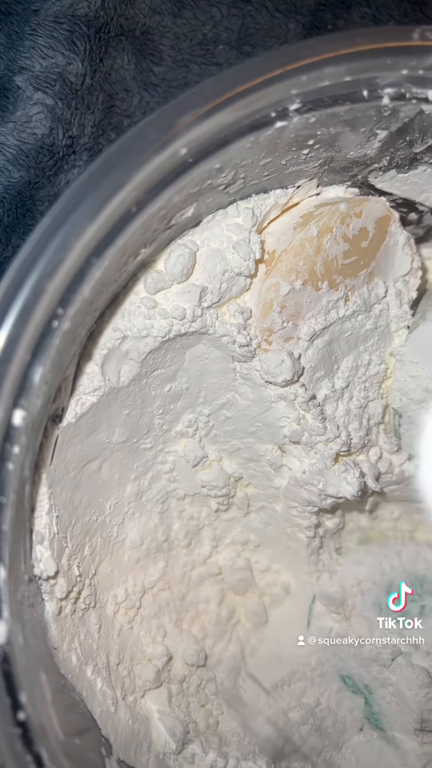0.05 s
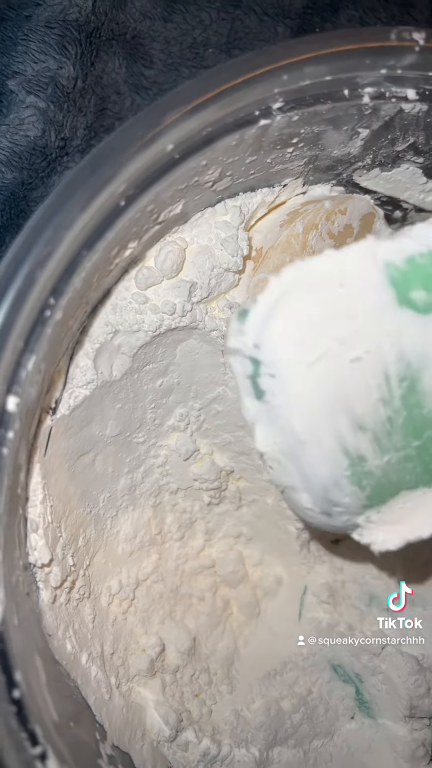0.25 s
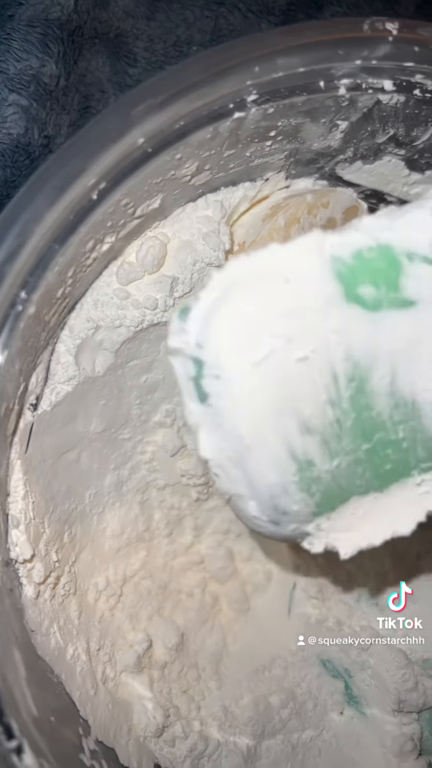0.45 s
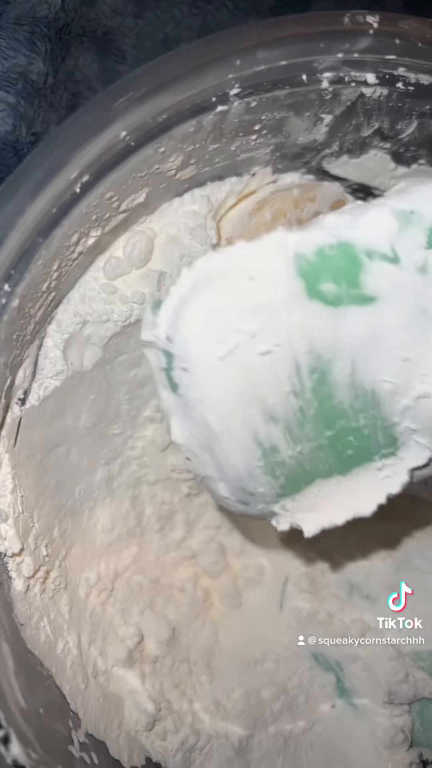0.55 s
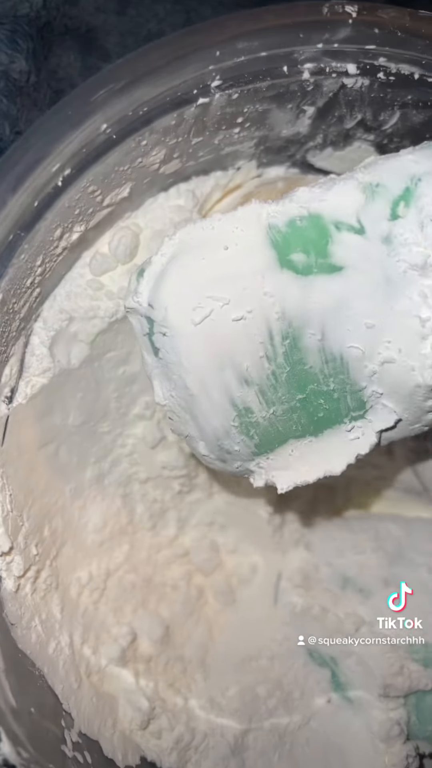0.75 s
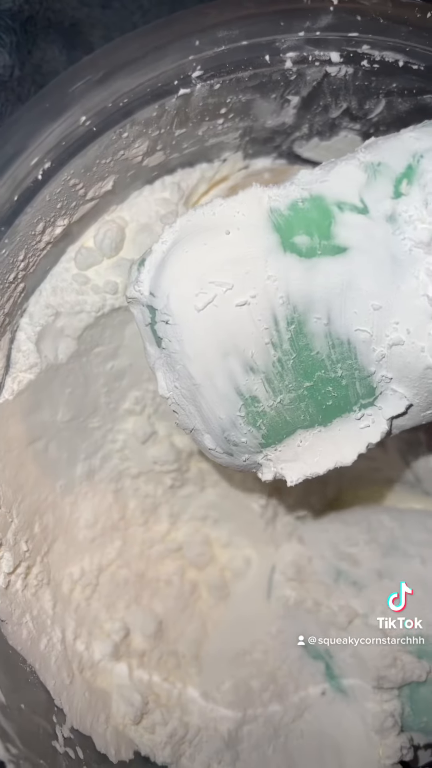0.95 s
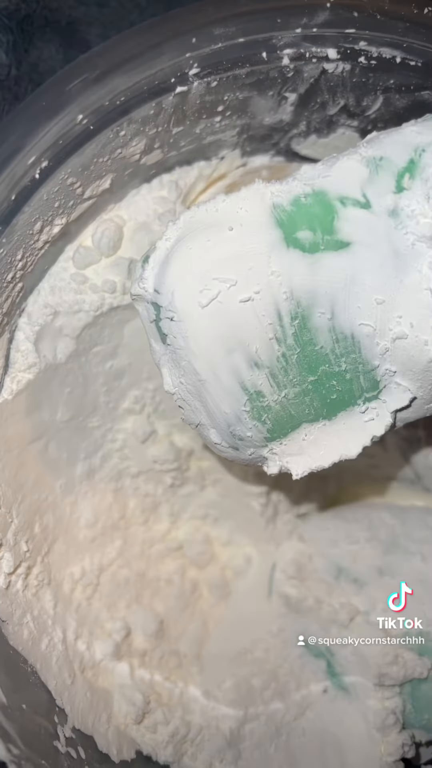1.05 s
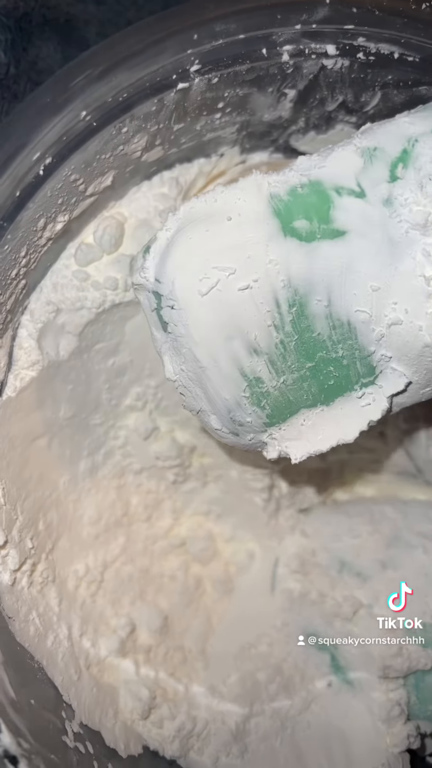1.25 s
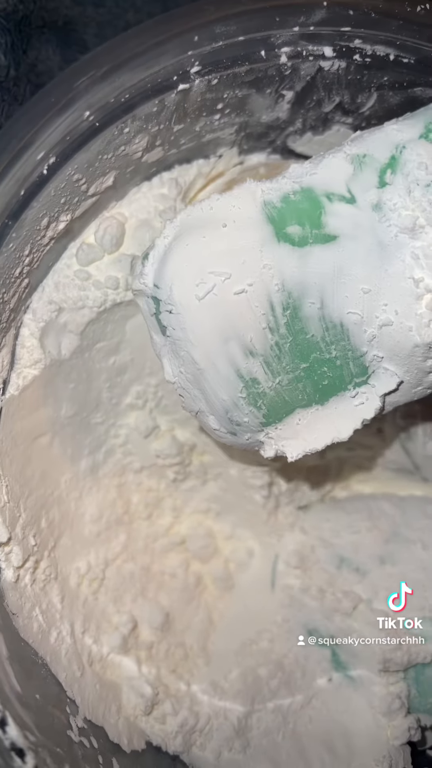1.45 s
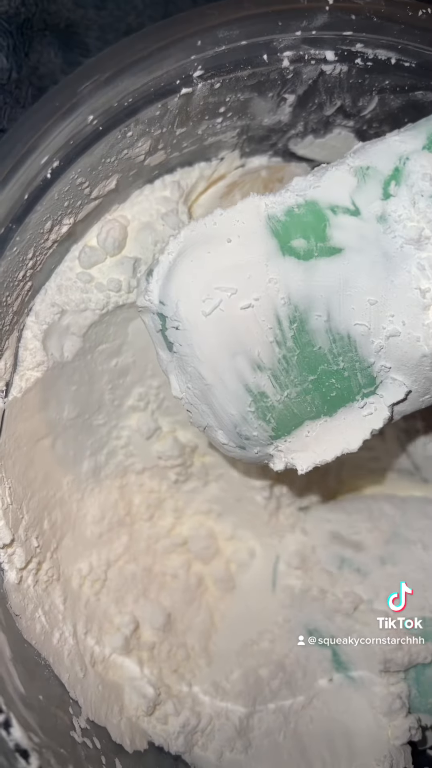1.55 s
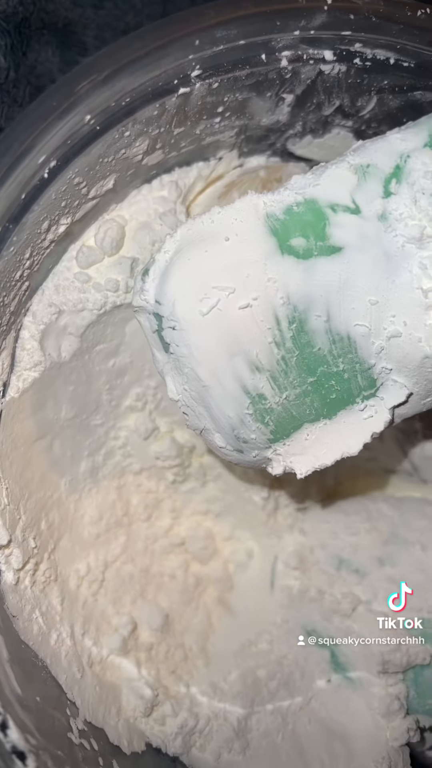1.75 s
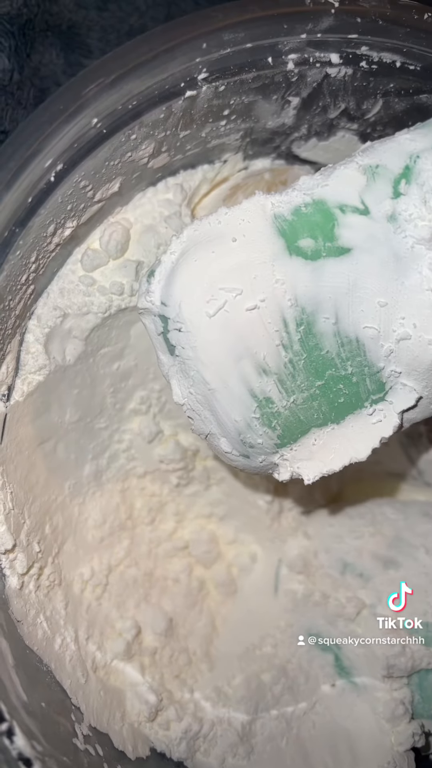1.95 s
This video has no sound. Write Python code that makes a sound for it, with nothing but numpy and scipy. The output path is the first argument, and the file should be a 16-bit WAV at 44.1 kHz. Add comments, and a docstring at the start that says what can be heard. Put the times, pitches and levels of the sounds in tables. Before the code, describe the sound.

Cornstarch crunches and squeaks as a spatula presses into it twice in a bowl.

```python
"""In a bowl of cornstarch, close to the microphone, a spatula is pressed down twice.
The powder yields by stick-slip friction: quick bursts of tiny grain clicks grow into separate
creaking snaps as it packs, and the hollow under the spatula resonates. Each press ends in a short
squeak, where the slips fuse into a tone. Around the presses come ticking crumbs, small knocks of
the bowl and soft rustles, over a low handling rumble. At the very end a new press just begins."""
import sys
import numpy as np
from scipy import signal
from scipy.io import wavfile
from scipy.ndimage import uniform_filter1d

SR = 44100
rng = np.random.default_rng(int(sys.argv[2]) if len(sys.argv) > 2 else 0)


def wav_record(signal):
    """Record a signal, one row per channel, as 16-bit PCM in the file named by sys.argv[1]."""
    frames = np.transpose(np.atleast_2d(signal))
    bounded = np.clip(frames, -1, 1)
    # unit amplitude maps onto the largest positive 16-bit level
    quanta = np.round(bounded * 32767).astype(np.int16)
    wavfile.write(sys.argv[1], SR, quanta)


N = 88200
T = np.arange(N) / SR

# strength of the handling rumble: t/s, level/dB
RUMBLE_ENVELOPE = [(0, -55.5), (.9, -56), (1.62, -56.5), (1.74, -54.5), (1.85, -57.5)]
# spectra of the rumble and of hiss: f/Hz, relative level/dB
RUMBLE_SPECTRUM = [(20, -37), (52, 3), (70, -5.5), (110, -8), (260, -21.5), (700, -51.5)]
HISS_SPECTRUM = [(100, -9), (400, 2), (900, -10.5), (2500, -9.5), (6000, -22.5), (15000, -39.5)]
# crumbs ticking as the spatula arrives: t/s, level/dB
CRUMB_TICKS = [(0.0131, -47), (0.0362, -41.5), (0.067, -46.5), (0.142, -54), (0.162, -51), (.186, -42),
               (1.304, -52)]
# spectra of loose and of packed powder: f/Hz, relative level/dB
LOOSE_SPECTRUM = [(120, -9), (440, -8), (700, -15.5), (1150, -16.5), (2340, -3), (3240, -12.5), (3580, -12),
                  (5170, -19), (5960, -26.5), (10100, -36.5), (15500, -47.5)]
PACKED_SPECTRUM = [(120, -30.5), (270, -12.5), (450, -3.5), (1000, -2.5), (1220, -11.5), (1530, 0),
                   (1950, -5.5), (2600, -2.5), (3150, -10.5), (3600, -5), (5000, -15), (6400, -24.5),
                   (9700, -30.5), (15500, -38)]
# first press: t/s, level/dB, slip rate/Hz, level of slip over stick/dB, packing (0-1)
PACKING_PRESS = [(.19, -66, 280, -23, 0), (.255, -47, 237, -3, .1), (.32, -38, 223, 11, 0.32),
                 (.405, -36.5, 171, 5, 0.06), (.44, -38, 167, 11.5, 0.37), (.605, -37, 149, 14, 0.36),
                 (.66, -34, 169, 13.5, 0.56), (.77, -35, 170, 16.5, 0.69), (.86, -43.5, 190, 8.5, 0.71),
                 (.93, -37, 190, 16, 1), (.99, -59.5, 92, 28, 0.88)]
# second press, into packed powder: t/s, level/dB
PACKED_PRESS = [(1.31, -61.5), (1.45, -42.5), (1.495, -38.5), (1.55, -37.5), (1.625, -41), (1.645, -45.5),
                (1.688, -54), (1.708, -47), (1.755, -75)]
# resonance of the hollow under the spatula: t/s, f/Hz, gain/dB
HOLLOW_RESONANCE = [(.28, 370, 5), (.405, 407, 15), (.435, 446, -1), (.47, 470, 9.5), (.74, 572, 3),
                    (.95, 565, 9), (1.48, 425, 12), (1.6, 546, 3.5), (1.67, 406, 14)]
# knocks of the bowl: t/s, click level/dB, thud level/dB
BOWL_KNOCKS = [(0.199, -40, -46), (.565, -37, -45), (.906, -34, -45.5), (0.991, -37.5, -46.5),
               (1.2154, -48, -47), (1.874, -45.5, -49.5)]
# spectrum of the spatula, rubbed or knocked: f/Hz, relative level/dB
SPATULA_SPECTRUM = [(230, 3.5), (600, -1.5), (1100, -17), (1500, -8), (2900, -10.5), (3450, -5),
                    (4500, -19), (5100, -11), (6200, -36.5), (12000, -43)]
# separate collapses of the powder: t/s, level/dB
COLLAPSES = [(0.3958, -26), (0.4579, -26), (0.536, -27.5), (0.5652, -19.5), (0.5682, -23), (0.6309, -30),
             (.6441, -26.5), (0.6557, -23.5), (0.6628, -26), (0.6723, -26.5), (.6947, -27.5), (.72, -23.5),
             (.7252, -28.5), (0.7473, -26), (0.7558, -26), (0.7771, -25.5), (0.789, -34.5), (0.8114, -27),
             (.8261, -25.5), (0.8468, -24), (.857, -27), (0.8765, -23.5), (0.9085, -23.5), (.954, -31.5),
             (0.964, -34.5), (1.543, -32), (1.5632, -38), (1.5886, -30.5), (1.613, -37), (1.631, -30.5)]
# squeaks as the pressure lets go: t/s, duration/s, start f/Hz, end f/Hz, level/dB
RELEASE_SQUEAKS = [(1.0298, .0235, 823, 3040, -43.5), (1.704, .033, 759, 2190, -52.5)]
# spectrum of a squeak: f/Hz, relative level/dB
SQUEAK_SPECTRUM = [(300, -9), (950, -2), (2450, 3.5), (3100, -7), (9000, -34.5)]
# a light rustle after each press, then the swelling crunch of a new press starting in loose powder:
# t/s, rise/s, decay/s, level/dB
GRAINY_SWELLS = [(1.103, 0.021, .12, -51.5), (1.795, 0.023, .11, -54), (1.96, 0.16, .1, -49.5)]


def amp(db):
    """Amplitude ratio of a level in decibels."""
    return 10 ** (np.asarray(db) / 20)


def unit_rms(x):
    """Normalisation to unit mean power."""
    return x / np.sqrt(np.mean(x ** 2) + 1e-20)


def unit_peak(x):
    """Normalisation to unit envelope at the loudest moment."""
    return x / np.sqrt(2 * uniform_filter1d(x ** 2, size=45).max())


def add(mix, s, sound):
    """Superposition of a sound that starts at time s."""
    part = mix[max(round(s * SR), 0):][:len(sound)]
    part += sound[:len(part)]


def add_centred(mix, s, sound):
    """Superposition of a sound centred on time s."""
    half = len(sound) // 2
    padded = np.pad(mix, (half, 0))
    add(padded, s, sound)
    mix[:] = padded[half:]


def curves(table):
    """Linear interpolation of each column over time."""
    s, *columns = np.transpose(table)
    return [np.interp(T, s, c) for c in columns]


def during(table):
    """Rectangular window over a table's time span."""
    return (T > table[0][0]) & (T < table[-1][0])


def colour(x, spectrum, size=4096):
    """Minimum-phase filtering, with unit energy in the impulse response."""
    f, db = np.transpose(spectrum)
    hz = abs(np.fft.fftfreq(size, 1 / SR))
    gain = amp(np.interp(np.log(hz + 1), np.log(f + 1), db))
    log_gain = np.log(np.maximum(gain, 1e-5))
    response = np.exp(np.conj(signal.hilbert(log_gain)))
    taps = np.fft.ifft(response).real[:size // 2]
    return signal.fftconvolve(x, taps / np.linalg.norm(taps))[:len(x)]


def background():
    """Filtered noise: low handling rumble and a faint hiss."""
    rumble = unit_rms(colour(rng.standard_normal(N), RUMBLE_SPECTRUM, size=16384))
    hiss = amp(-64) * colour(rng.standard_normal(N), HISS_SPECTRUM)
    return rumble * amp(curves(RUMBLE_ENVELOPE)[0]) + hiss


def burst(ms, size=2048):
    """A brief pulse is broadband: a main slip inside a longer, weaker shower of grains."""
    t_ms = (np.arange(size) - size // 2) * 1000 / SR
    main, skirt = (np.cos(np.pi * np.clip(t_ms / width, -.5, .5)) ** 2 for width in (ms, 1.9 * ms))
    return rng.standard_normal(size) * (main + amp(-19.5) * skirt)


def softened(x, level_db):
    """Gentle pressure breaks grains less sharply, and a blunter pulse carries less treble."""
    low = signal.sosfiltfilt(signal.butter(2, 5360, fs=SR, output="sos"), x)
    treble_db = 0.8 * np.maximum(level_db + 35, -20)  # flat at a level of -35 dB
    return low + (x - low) * amp(treble_db)


def crumbs():
    """Impulsive excitation: loose crumbs tick as the spatula arrives."""
    out = np.zeros(N)
    for s, db in CRUMB_TICKS:
        tick = colour(softened(burst(ms=2.4), db), LOOSE_SPECTRUM)
        add_centred(out, s, amp(db) * unit_peak(tick))
    return out


def bowl_reflections(x, decay_s=0.01):
    """Early reflections from the walls of the bowl die away exponentially."""
    t = T[:SR // 20]
    taps = rng.standard_normal(len(t)) * np.exp(-t / decay_s)
    return x + amp(-11.5) * signal.fftconvolve(x, taps / np.linalg.norm(taps))[:N]


def stick_slip(level_db, slip_hz, depth_db, jitter=.22, decay_cycles=.32, grains_per_s=11000):
    """Relaxation oscillation: each uneven slip sets off a dying shower of grain clicks."""
    wander = unit_rms(uniform_filter1d(rng.standard_normal(N), size=300))
    cycles = np.cumsum(slip_hz * np.exp(jitter * wander)) / SR
    strength_db = rng.standard_normal(N)[cycles.astype(int)]  # one draw per slip
    envelope = amp(strength_db + depth_db * np.exp(-(cycles % 1 / decay_cycles) ** 2))
    grains = rng.choice([-1, 1], N) * amp(2 * rng.standard_normal(N))
    grains *= rng.random(N) < grains_per_s / SR
    shower = envelope * grains
    running_rms = np.sqrt(abs(uniform_filter1d(shower ** 2, size=1100)) + 1e-9)
    return amp(level_db) * softened(shower, level_db) / running_rms


def powder(x, packing):
    """Compaction shifts the powder's spectrum from loose to packed."""
    return (1 - packing) * colour(x, LOOSE_SPECTRUM) + packing * colour(x, PACKED_SPECTRUM)


def resonate(x, hz, width_hz):
    """Resonance by heterodyning: shift hz down to zero, low-pass, shift back."""
    carrier = np.exp(2j * np.pi * np.cumsum(hz * np.ones(N)) / SR)
    r = np.exp(-np.pi * width_hz / SR)
    baseband = signal.lfilter([(1 - r) ** 2], [1, -2 * r, r * r], x / carrier + 1e-18)
    return 2 * (carrier * baseband).real


def hollow(x, packing):
    """Cavity resonance: the hollow groans at a moving pitch; packing adds a higher mode."""
    hz, db = curves(HOLLOW_RESONANCE)
    lower = amp(db) * resonate(x, hz, width_hz=225)
    upper = amp(6.5) * packing * resonate(x, hz=891, width_hz=245)
    return lower + upper


def presses(packing):
    """Source and filter: two spells of stick-slip friction excite the powder and the hollow."""
    level_db, slip_hz, depth_db, _ = curves(PACKING_PRESS)
    first = stick_slip(level_db, slip_hz, depth_db) * during(PACKING_PRESS)
    second = stick_slip(*curves(PACKED_PRESS), slip_hz=420, depth_db=5.5) * during(PACKED_PRESS)
    return powder(first, packing) + colour(second, PACKED_SPECTRUM) + hollow(first + second, packing)


def knocks(start_hz=718, end_hz=54.4, fall_s=0.0067, ring_hz=494):
    """Damped vibration after impact: a click, a short hollow ring and a thud of falling pitch."""
    out, t = np.zeros(N), T[:SR // 5]
    hz = end_hz + (start_hz - end_hz) / (1 + t / fall_s) ** 2
    thud = np.sin(2 * np.pi * np.cumsum(hz) / SR) * np.exp(-t / 0.11)
    ring = amp(2) * np.sin(2 * np.pi * ring_hz * t) * np.exp(-t / 0.0019)
    for s, click_db, thud_db in BOWL_KNOCKS:
        click = unit_peak(colour(burst(ms=6), SPATULA_SPECTRUM))
        add_centred(out, s + 0.0017, amp(click_db) * click)
        add(out, s, amp(thud_db) * (thud + ring))
    return out


def dust_fizz(peak_s=0.68, width_s=0.23):
    """Incoherent noise: the finest dust hisses smoothly at the height of the first press."""
    hiss = colour(rng.standard_normal(N), HISS_SPECTRUM)
    fizz = signal.sosfilt(signal.butter(2, 6600, "high", fs=SR, output="sos"), hiss)
    return amp(-58) * unit_rms(fizz) * np.exp(-((T - peak_s) / width_s) ** 2)


def snaps(packing, ms=2.7, ring_hz=912, ring_s=0.0015):
    """Sudden release of stress: large slips, which ring briefly once the powder is packed."""
    out, t = np.zeros(N), T[:SR // 20]
    ring_envelope = amp(-2.5) * t / ring_s * np.exp(1 - t / ring_s)
    for s, db in COLLAPSES:
        packed = packing[round(s * SR)]
        ring = ring_envelope * np.sin(2 * np.pi * ring_hz * rng.uniform(0.938, 1.055) * t)
        crack = powder(softened(burst(ms), level_db=-37.5), packed)
        add_centred(out, s, amp(db) * unit_peak(crack))
        add(out, s - ms / 2000, amp(db) * packed ** 2 * ring)  # from the onset of the slip
    return out


def squeaks():
    """Frictional self-oscillation: slips so fast that they fuse into a rough rising tone."""
    out = np.zeros(N)
    for s, length, start_hz, end_hz, db in RELEASE_SQUEAKS:
        progress = np.arange(0, 1, 1 / (length * SR))
        pitch_noise, rasp_noise = rng.standard_normal((2, N))[:, :len(progress)]
        wobble = 1 + .1 * unit_rms(uniform_filter1d(pitch_noise, size=30))
        hz = start_hz * (end_hz / start_hz) ** progress * wobble
        phase = 2 * np.pi * np.cumsum(hz) / SR
        tone = unit_rms(colour(sum(np.cos(k * phase) for k in (1, 2, 3)), SQUEAK_SPECTRUM))
        rasp = amp(4) * (1 - progress) * colour(rasp_noise, SQUEAK_SPECTRUM)
        add(out, s, amp(db) * np.sqrt(np.sin(np.pi * progress)) * (tone + rasp))
    return out


def grainy_swells():
    """Friction noise: a rustle rises and fades after each press, then a new press starts to crunch."""
    envelope = np.zeros(N)
    for s, rise, decay, db in GRAINY_SWELLS:
        attack = np.clip((T - s) / rise, 0, 1)
        envelope += amp(db) * attack * np.exp(-np.maximum(T - s - rise, 0) / decay)
    grain_db = 3.3 * unit_rms(uniform_filter1d(rng.standard_normal(N), size=120))
    return envelope * unit_rms(colour(rng.standard_normal(N) * amp(grain_db), SPATULA_SPECTRUM))


def scene():
    """Superposition of all sources at one close microphone."""
    packing = curves(PACKING_PRESS)[-1]
    in_bowl = presses(packing) + dust_fizz() + snaps(packing) + crumbs() + squeaks() + grainy_swells()
    return (bowl_reflections(in_bowl) + knocks() + background())[None]


def record(dry, cutoff_hz=15750):
    """Band limiting by a linear-phase low-pass filter."""
    taps = signal.firwin(511, cutoff_hz, window=("kaiser", 9), fs=SR)
    return signal.oaconvolve(dry, taps[None], "same")


dry = scene()
out = record(dry)
wav_record(out)
```